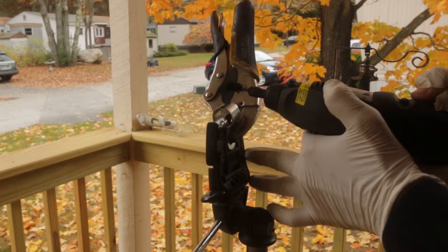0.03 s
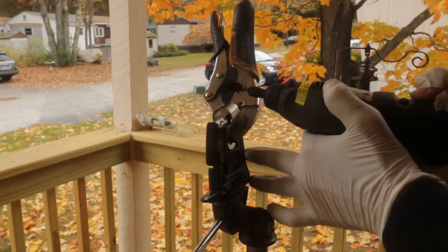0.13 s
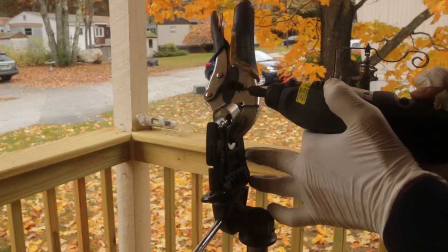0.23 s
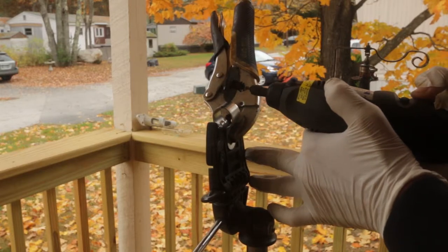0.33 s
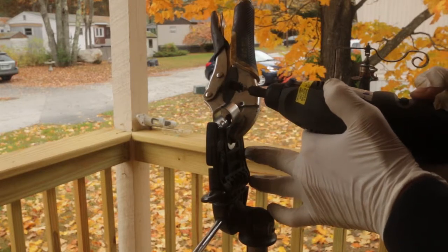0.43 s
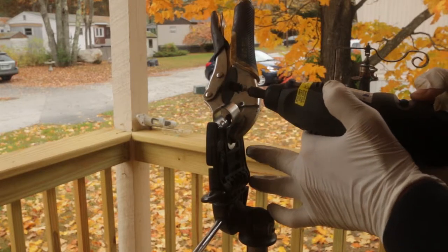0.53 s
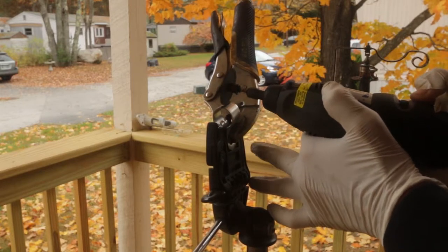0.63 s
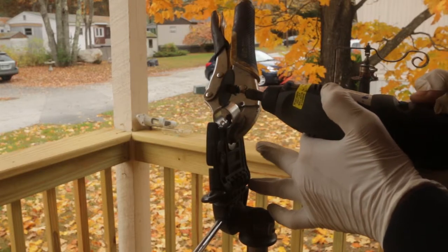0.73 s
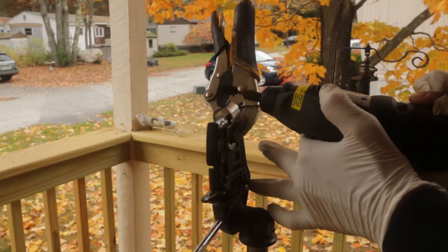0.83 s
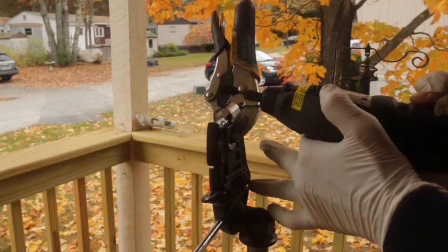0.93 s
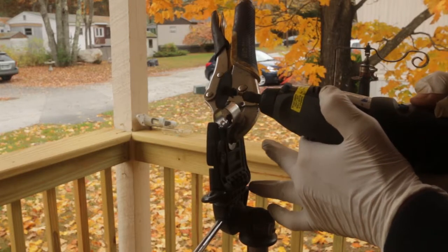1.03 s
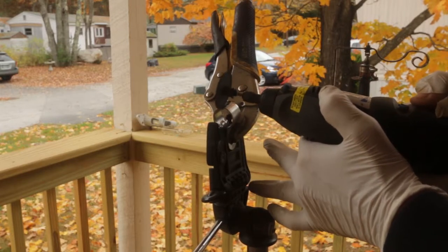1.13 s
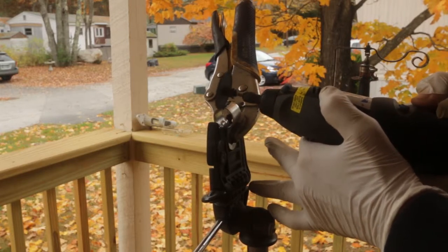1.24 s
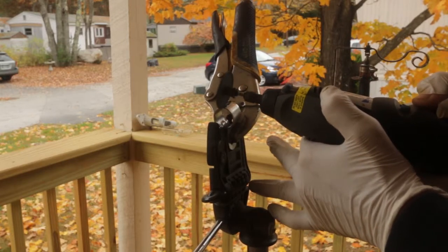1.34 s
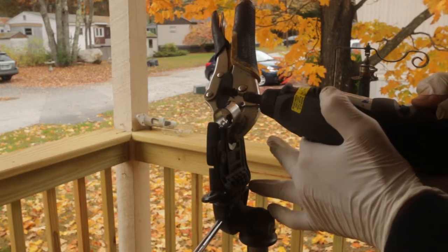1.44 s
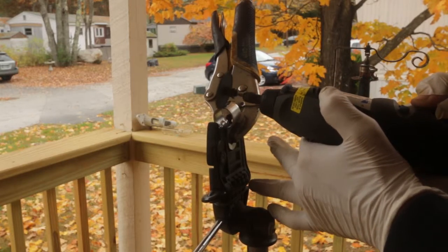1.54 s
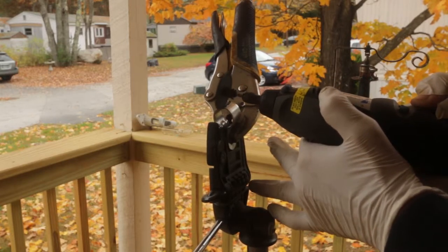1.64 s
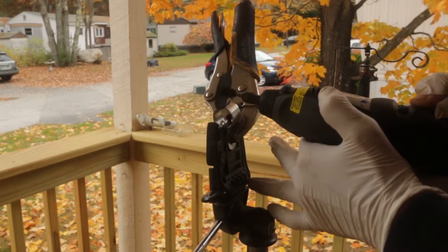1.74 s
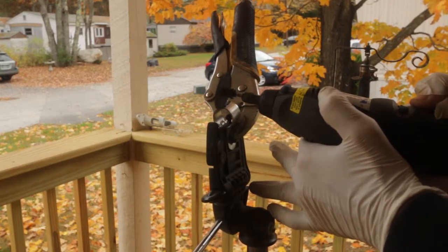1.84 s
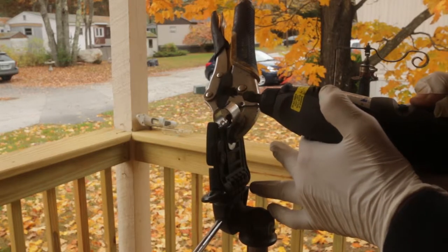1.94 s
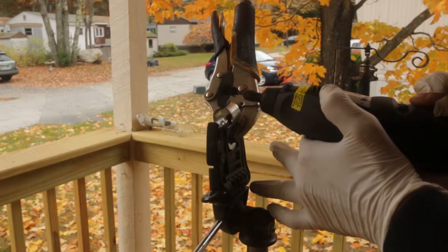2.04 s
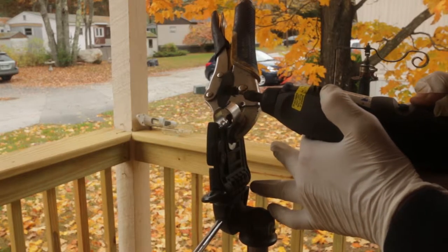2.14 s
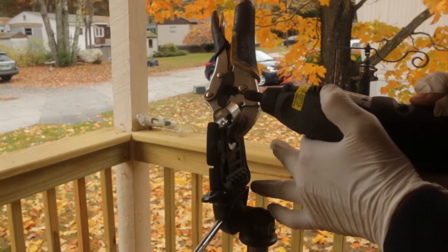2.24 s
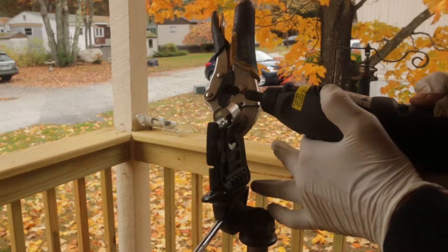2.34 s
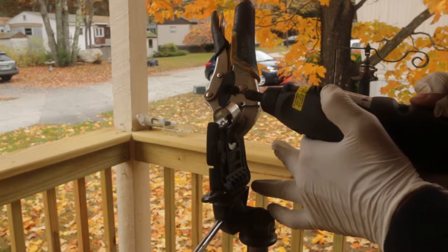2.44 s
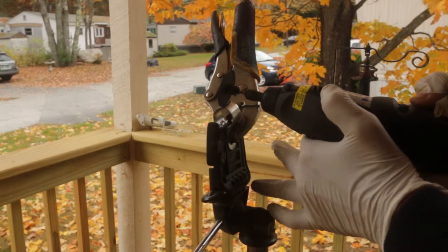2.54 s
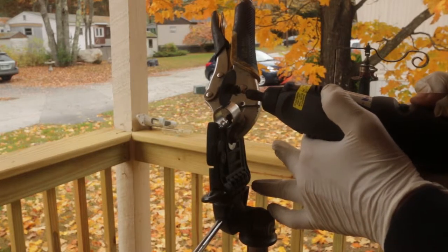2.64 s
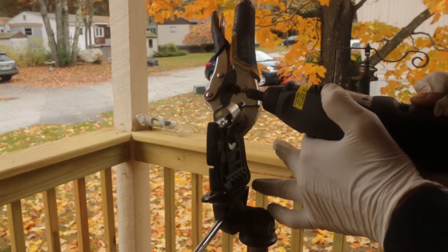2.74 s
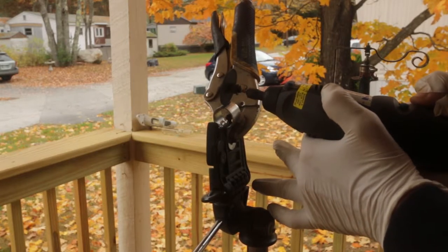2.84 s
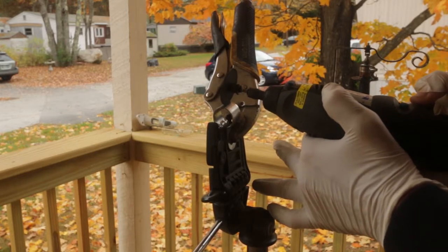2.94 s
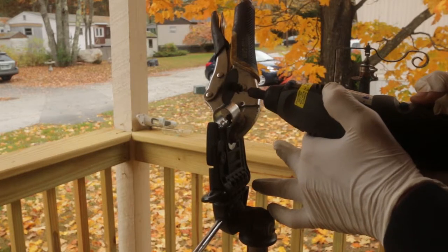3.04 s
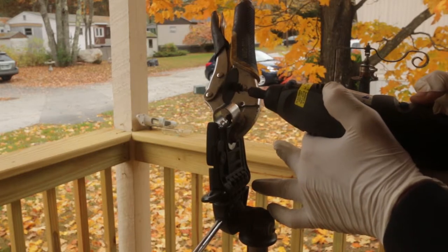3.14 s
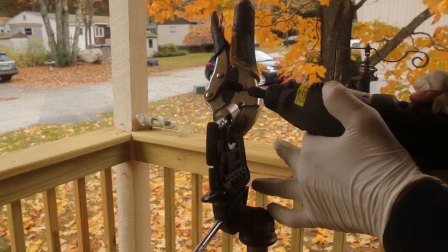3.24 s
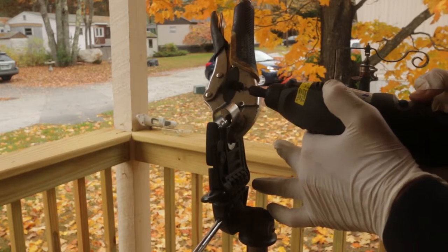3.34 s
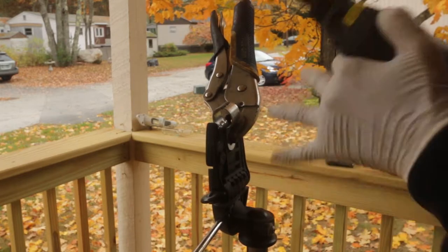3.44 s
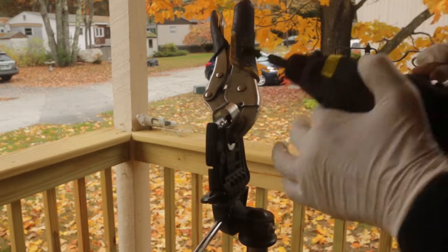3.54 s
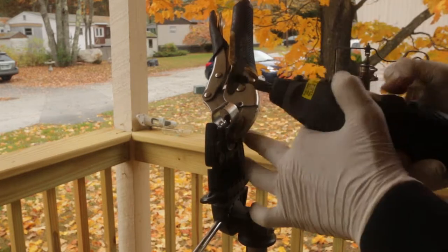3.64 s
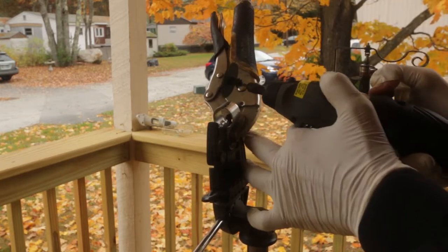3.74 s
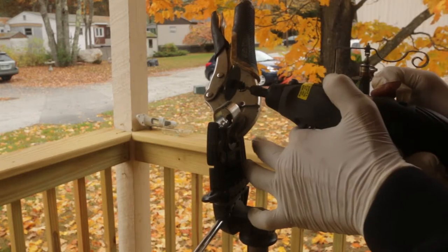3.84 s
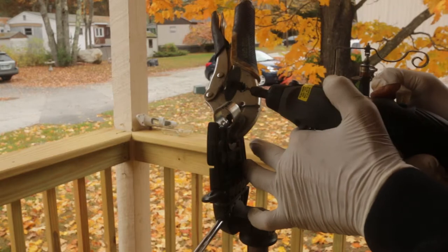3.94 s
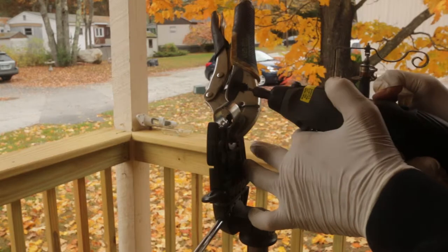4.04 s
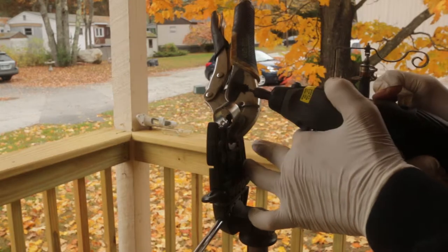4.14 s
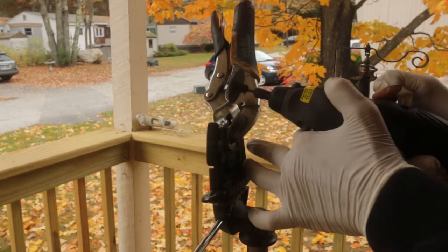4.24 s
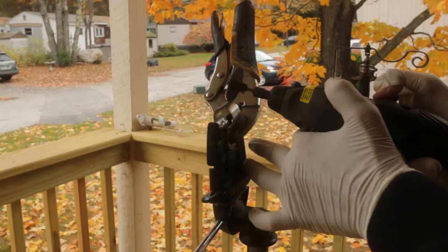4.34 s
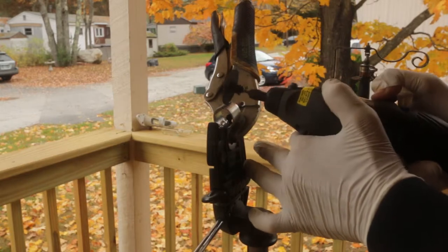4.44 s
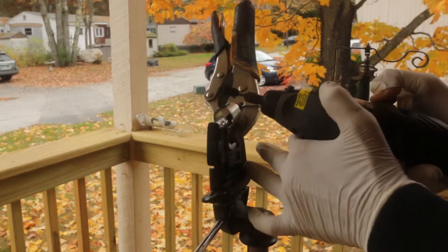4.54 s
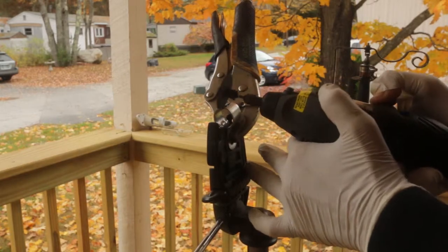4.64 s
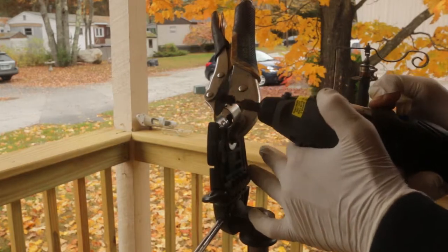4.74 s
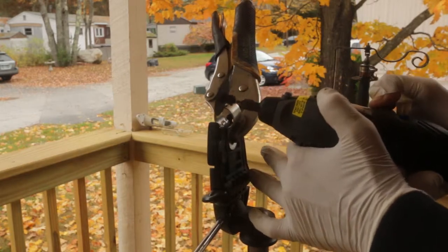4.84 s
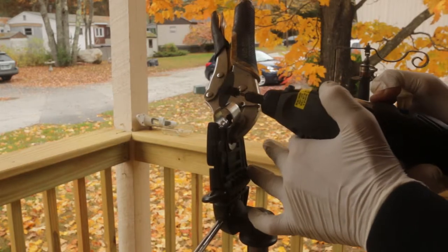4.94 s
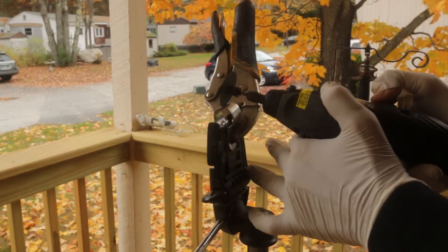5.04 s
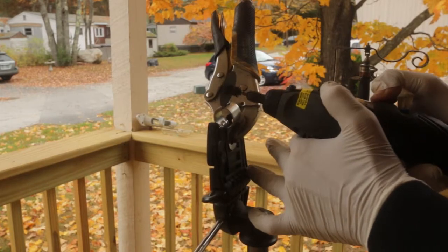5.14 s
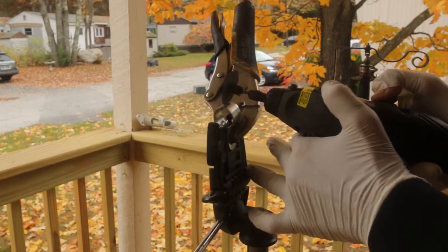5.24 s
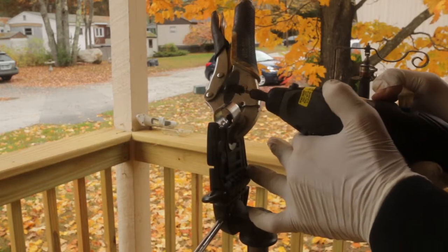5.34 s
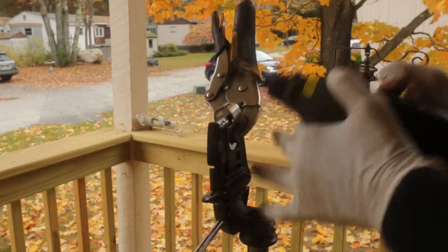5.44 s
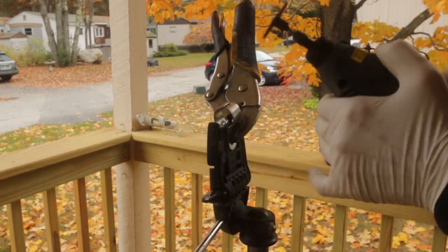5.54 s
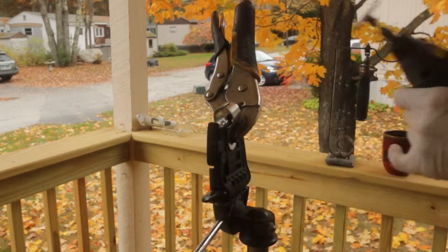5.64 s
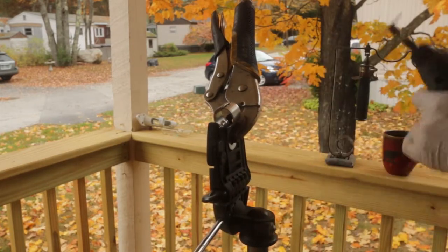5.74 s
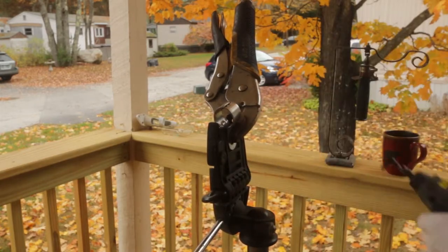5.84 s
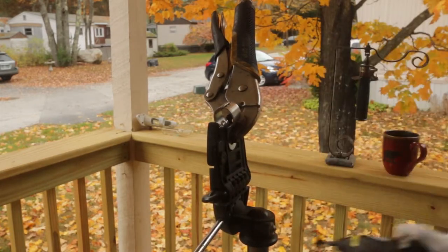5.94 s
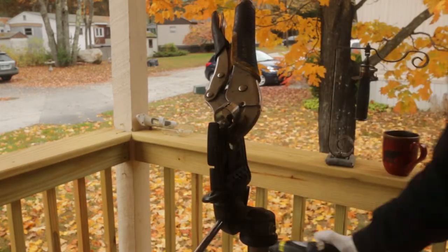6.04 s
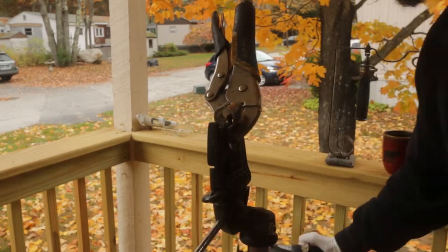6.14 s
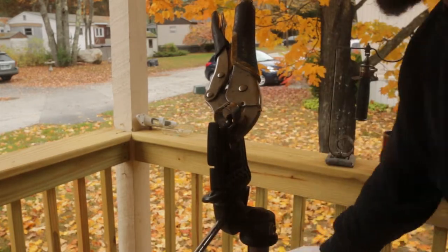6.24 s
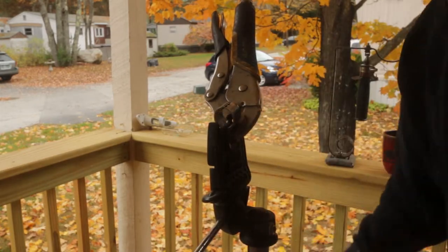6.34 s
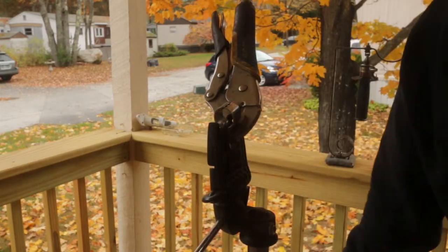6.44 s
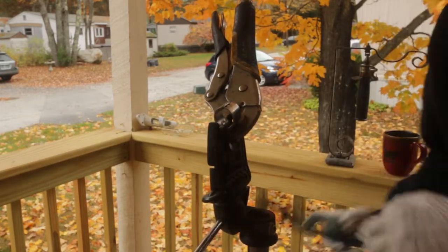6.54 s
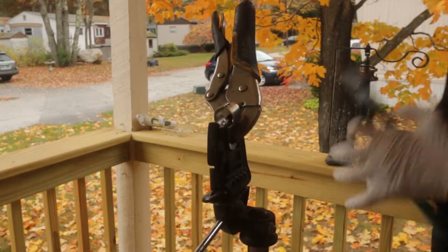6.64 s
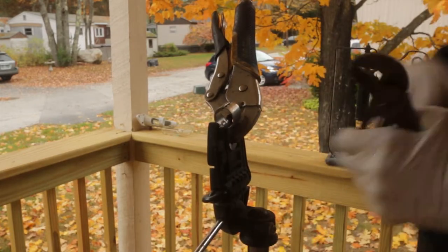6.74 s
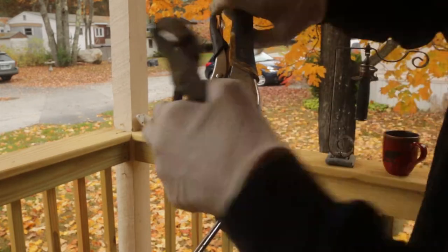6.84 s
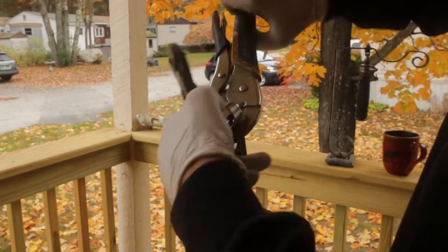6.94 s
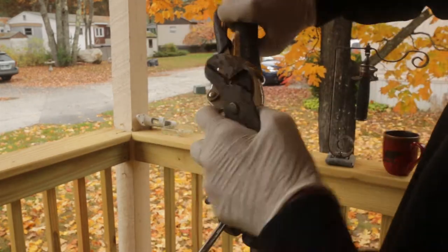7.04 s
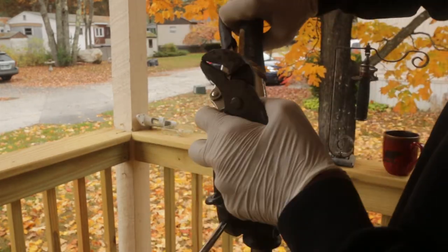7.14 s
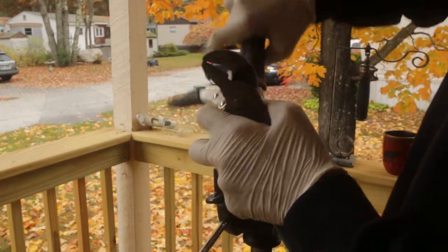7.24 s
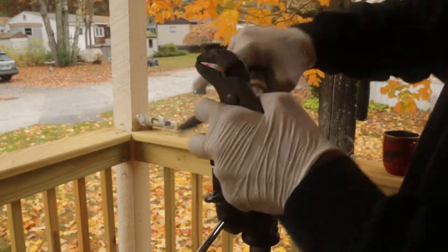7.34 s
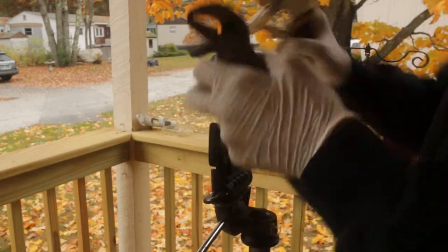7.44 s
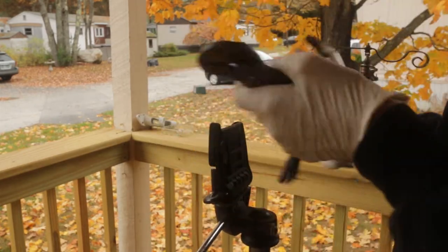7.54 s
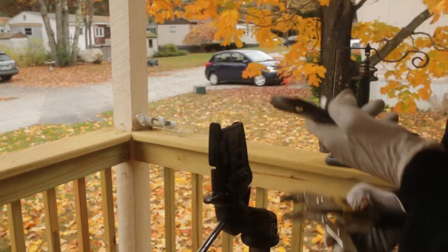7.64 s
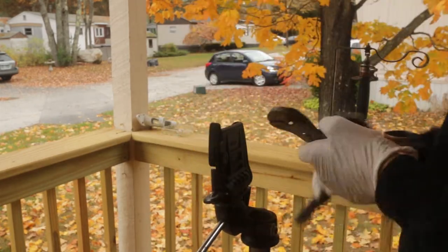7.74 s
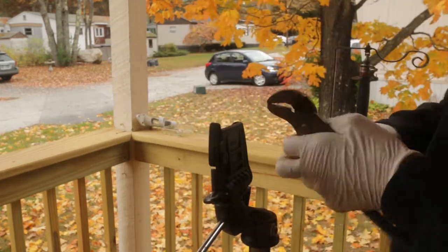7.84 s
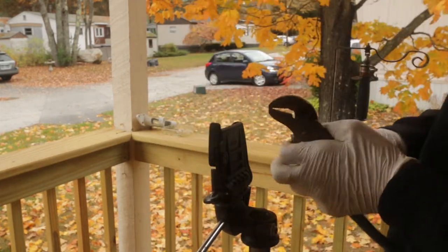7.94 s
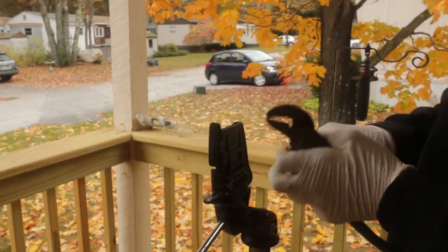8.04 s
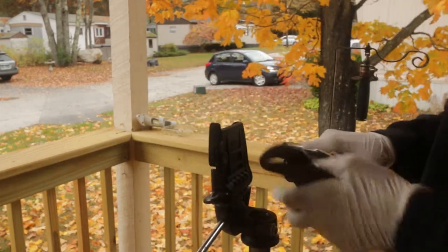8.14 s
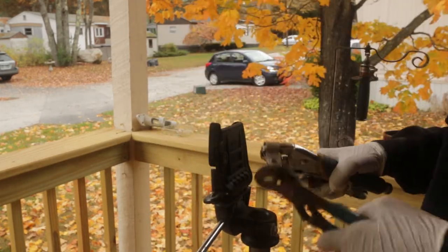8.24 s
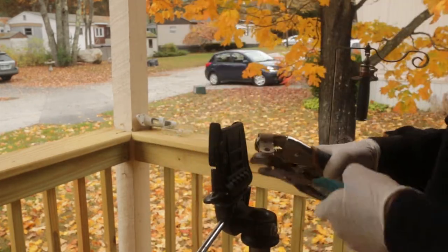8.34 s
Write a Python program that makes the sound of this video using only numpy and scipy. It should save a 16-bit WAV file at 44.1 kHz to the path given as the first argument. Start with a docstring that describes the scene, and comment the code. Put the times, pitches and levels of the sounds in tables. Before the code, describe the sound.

Very close on an open porch, a small high-speed rotary tool grinds plastic with a shrill, wavering whine and bright abrasive hiss. It lifts and races up briefly, bites again with its pitch sagging, lifts once more and spins down to a stop. Then knocks on a wooden rail, plier ticks, a faint creak, one loud brittle snap and light metallic clicks over soft outdoor air and a droning car.

```python
"""On an open porch a small rotary tool grinds through a plastic part, close to the two microphones.
Motor harmonics sag with a table of cutting speeds, race up at two lifts and coast to a stop; filtered
noise makes the grinding hiss and the fan. Noise bursts knock on wood, creak, click like pliers and snap
the part off. Behind, shaped noise and wavering sines make the outdoor air and a car on the street."""
import sys
import numpy as np
from scipy import signal
from scipy.fft import rfft, irfft, next_fast_len
from scipy.io import wavfile

SR = 44100
rng = np.random.default_rng(int(sys.argv[2]) if len(sys.argv) > 2 else 0)


def file_out(sig):
    """Save sig as 16-bit WAV at sys.argv[1]."""
    # one column per channel
    cols = np.atleast_2d(sig).T
    # limit, then scale
    lim = np.clip(cols, -1, 1)
    pcm = np.round(lim * 32767).astype(np.int16)
    wavfile.write(sys.argv[1], SR, pcm)


N = 369558
T = np.arange(N) / SR

CHOP_HZ = 447  # rate at which the motor current is chopped
FREE_HZ, LOADED_HZ = 1620, 1100  # whine fundamental running free and under full load
OFF_S, STOP_S = 5.82, 6.19  # switched off, shaft at rest
RELEASE_S = 0.018

# the wheel in the plastic, levels before pressure and resonance act on them:
# start_s, end_s, squeal_db, rim_ring_db, upper_harmonics_db
CUTS = [(-0.1, 3.485, -25.5, -53, 1), (3.88, 5.528, -35, -26.5, -4.5)]


def undb(db):
    """Decibels to gain."""
    return 10 ** (np.asarray(db) / 20)


def unit(x):
    """Scale to rms 1."""
    return x / np.sqrt(np.mean(x ** 2))


def noise():
    """White noise as long as the scene."""
    return rng.standard_normal(N)


def curves(table):
    """The columns of a table, joined by straight lines in time."""
    s, *columns = np.transpose(table)
    return [np.interp(T, s, c) for c in columns]


def shape(x, gain):
    """Filter by a response given as a function of frequency."""
    size = next_fast_len(len(x) + 4096)
    hz = np.maximum(np.arange(size // 2 + 1) * SR / size, 1)
    return irfft(rfft(x, size) * gain(hz), size)[:len(x)]


def colour(x, points):
    """Filter by a (Hz, dB) spectrum, joined over log frequency."""
    at, db = np.transpose(points)
    return shape(x, lambda hz: undb(np.interp(np.log(hz), np.log(at), db)))


def tinted(x, gain):
    """Filter without changing the power of white noise."""
    return shape(x, lambda hz: gain(hz) / np.sqrt(np.mean(abs(gain(hz)) ** 2)))


def resonance(hz, centre, width):
    """Response of one damped mode, 1 at its centre."""
    return 1 / (1 + 1j * (hz ** 2 - centre ** 2) / (hz * width))


def ragged(hz, spacing_hz):
    """Random hills and dips over frequency, spread 1: many close modes and reflections."""
    heights = rng.standard_normal(1024)
    return np.interp(hz / spacing_hz, np.arange(len(heights)), heights)


def walk(rate):
    """A random wander of rms 1, straight lines between `rate` new values a second."""
    steps = rng.standard_normal(8192)
    return unit(np.interp(T * rate, np.arange(len(steps)), steps))


def partial(phase, hz):
    """A sine of rms 1, silent above 17.6 kHz."""
    return np.sqrt(2) * np.sin(phase) * (hz < SR * .4)


def burst(t60, size=16384):
    """Contact noise that dies away, rms 1 at its start."""
    decay = np.exp(-np.log(1000) * np.arange(size) / SR / max(t60, .002))
    return rng.standard_normal(size) * decay


def add(out, s, x):
    """Mix x in at time s."""
    i = int(s * SR)
    out[i:i + len(x)] += x[:N - i]


def gate(start, end):
    """1 between two times, with a quick bite and release."""
    bite_s = .04
    return np.clip(np.minimum((T - start) / bite_s, (end - T) / RELEASE_S), 0, 1)


def during_cuts(gains):
    """One gain for each cut, zero while the wheel is clear of the plastic."""
    return sum(gain * gate(start, end) for gain, (start, end, *_) in zip(gains, CUTS))


def speed():
    """The cut holds the motor back; lifted, it races up; switched off, drag and friction stop it."""
    # motor speed in the plastic: start_s, whine_fundamental_hz
    first_cut_speed = [(0.03, 1154), (0.12, 1177), (0.29, 1159), (0.48, 1082), (0.55, 1128), (0.66, 1010),
                       (0.77, 1003), (1.03, 1054), (1.09, 1036), (1.23, 1195), (1.31, 1194), (1.39, 1147),
                       (2.0, 1083), (2.31, 1071), (2.64, 995), (2.86, 1041), (3.01, 1022), (3.18, 1084),
                       (3.25, 1069), (3.44, 1099)]
    second_cut_speed = [(3.89, 1596), (3.984, 1563), (4.256, 1327), (4.364, 1315), (4.57, 1091),
                        (4.652, 1209), (4.736, 1209), (4.898, 1086), (5.038, 1103), (5.168, 952),
                        (5.28, 995), (5.374, 932), (5.5, 940)]
    # wheel lifted clear, one row for each cut: start_s, free_speed_hz, time_constant_s
    lifts = [(3.482, 1615, .128), (5.503, 1640, .103)]
    drag_s, friction_hz_per_s = .55, 1400
    hz = np.zeros(N)
    for cut, (lift, free_hz, lag_s) in zip((first_cut_speed, second_cut_speed), lifts):
        held, = curves(cut)
        racing = free_hz + (held - free_hz) * np.exp(-np.maximum(T - lift, 0) / lag_s)
        hz = np.where((T >= cut[0][0]) | (hz == 0), racing, hz)
    brake = friction_hz_per_s * drag_s
    off_hz = np.interp(OFF_S, T, hz)
    coasting = (off_hz + brake) * np.exp(-np.maximum(T - OFF_S, 0) / drag_s) - brake
    return np.maximum(np.where(T < OFF_S, hz, coasting), 1)


def load(hz):
    """Pressure on the wheel and motor current, 0-1: the further the speed sags in a cut, the greater both."""
    idle_press, idle_current = .1, .3
    sag = during_cuts([1, 1]) * np.clip((FREE_HZ - hz) / (FREE_HZ - LOADED_HZ), 0, 1)
    powered = np.clip((OFF_S - T) / RELEASE_S + 1, 0, 1)
    press = powered * (idle_press + (1 - idle_press) * sag)
    current = powered * (idle_current + (1 - idle_current) * sag ** 2)
    return press, current


def whine(hz, turn, chop, press, current, ripple_db=3.0, flutter_db=3.5, beat_db=-53):
    """Harmonics of the motor; each pulse of the chopped current jerks the rotor and hangs sidebands on them."""
    # upper harmonics, levels before speed, load and housing: multiple, loaded_db, free_db
    overtones = [(4, -52, -36), (5, -46, -34), (6, -50, -34), (7, -49, -35), (9, -42, -38),
                 (11, -42.5, -42), (14, -37.5, -50), (16, -41, -55)]
    pulses = np.sin(chop) + .35 * np.sin(2 * chop + 1)
    jerk = .15 * (1 - .55 * press) * np.minimum(4 * current, 1) * pulses
    angle = turn + jerk
    shaft = turn + .3 * jerk * (1 - press)
    out = shaking(hz, shaft, press) + squealing(hz, turn, chop, press)
    # running free, the lines grow with speed; coasting without current they are much weaker
    free = (hz / 1530) ** 3 * np.minimum(.22 + 3 * current, 1) * (1 - .6 * press ** 2)
    loaded = press * during_cuts(undb(db) for *_, db in CUTS)
    multiples, loaded_db, free_db = np.transpose(overtones)
    grid = np.linspace(0, SR / 2, 2048)
    for k in range(4, 17):
        loaded_size = loaded * undb(np.interp(k, multiples, loaded_db))
        free_size = free * undb(np.interp(k, multiples, free_db))
        lift_db = housing_db(grid + 1) + ripple_db * ragged(grid, 90)
        level_db = np.interp(k * hz, grid, lift_db) + flutter_db * walk(35) + 2 * press * walk(7)
        size = np.hypot(loaded_size, free_size) * undb(level_db)
        roughness = press * (.3 * walk(300) + .25 * walk(40))  # phase wander, radians
        out = out + size * partial(k * angle + roughness, k * hz)
    # speed and chopping beat in a faint lower tone
    out = out + undb(beat_db + 2 * walk(12)) * free * (1 - press) ** 2 * partial(turn - chop, hz)
    # the windings themselves hum at the chopping rate
    windings = undb(-53.5) * partial(chop, hz) + undb(-61) * partial(2 * chop, hz)
    return out + current * windings


def shaking(hz, shaft, press, floor_db=-55, waver_db=1.75):
    """Unbalance grows with the square of the speed; each low harmonic swells as it crosses a mode of the housing."""
    # housing modes that the unbalanced shaft shakes: centre_hz, width_hz, level_db
    shake_modes = [(1061, 250, -45.5), (1510, 190, -43), (2151, 37, -42.5), (2398, 23, -35.5),
                   (3116, 222, -30), (3740, 90, -23), (4345, 363, -14.5), (4730, 170, -16)]
    # relative level of the low harmonics as the grip shifts: start_s, first_db, second_db, third_db
    shake_level = [(0.1, -4.5, 3, -9), (0.4, 4, -2, -8), (.65, -6, 1, -5), (1.27, -7.5, -5, -19),
                   (1.45, 2, -1.5, -16), (3.4, -1.5, 1, -13), (3.49, -12, -11, -12), (3.64, 5, 2.5, -6.5),
                   (3.76, 1, 2.5, -8), (3.84, 3.5, 0.5, -11), (4.05, 0, -7.5, -12.5),
                   (4.25, -8.5, -0.5, -16), (4.8, -12, -3, -9), (5.47, 3.5, -7.5, -25),
                   (5.55, -13, -21, -23), (5.66, -3.5, -12, -15), (5.75, -2, -13.5, -14),
                   (5.86, -1, -16, -16), (5.93, 0, -9, -25), (6.12, 5, -4, 2)]
    out = 0
    for k, level_db in enumerate(curves(shake_level), 1):
        modes = sum(undb(d) / (1 + (2 * (k * hz - f) / w) ** 2) for f, w, d in shake_modes)
        response = undb(floor_db) + modes
        waver = waver_db * walk(9) + (.6 + 1.3 * press) * walk(60)
        out = out + response * undb(level_db + waver) * partial(k * shaft, k * hz)
    return out * (hz / LOADED_HZ) ** 2


def squealing(hz, turn, chop, press, flutter_db=1.9, swell_db=1.2):
    """The 8th harmonic and its sidebands squeal whenever they pass a sharp resonance of the motor."""
    # lines beside the 8th harmonic: multiple_of_chopping_rate, relative_level_db
    sidebands = [(-1, -2.5), (0, -3), (1, -5.5)]
    squeal_hz, width_hz, free_db = 9030, 360, -37
    cutting = press * during_cuts(undb(db) for _, _, db, _, _ in CUTS)
    size = undb(free_db) * (T < OFF_S) + cutting
    slip = 8 * turn + .27 * walk(250)
    out = 0
    for side, db in sidebands:
        line_hz = 8 * hz + round(side) * CHOP_HZ
        ring = abs(resonance(line_hz, squeal_hz, width_hz))
        level = undb(db + flutter_db * walk(50) + swell_db * walk(10))
        out = out + ring * level * partial(slip + round(side) * chop, line_hz)
    return size * out


def housing_db(hz):
    """How much the ringing housing and wheel lift each frequency."""
    # ringing modes: centre_hz, width_hz, lift_db
    housing = [(3750, 80, 13), (5120, 200, 5), (5720, 160, 7), (7250, 300, 5), (9900, 500, 4),
               (14500, 400, 8), (15400, 300, 6)]
    return sum(db * abs(resonance(hz, f, w)) ** 2 for f, w, db in housing)


def grinding(turn, chop, press, grain_db=0.8, chatter_db=1.0, bite=0.051, rasp_db=-1, hum_db=-52):
    """Grit tears the plastic in tiny grains, bunched by the turning wheel; the wheel's rim sings and the case hums."""
    # relative spectrum of the abrasive hiss: frequency_hz, density_db_per_hz
    hiss_spectrum = [(100, -38), (300, -44), (700, -26), (950, -34), (1350, -19), (2000, -11), (3000, -3),
                     (5000, -3), (8000, -1), (9500, 4), (11000, 0), (13000, 2.5), (15000, -4), (16000, 0.5)]
    # hiss before trim, pressure and chatter, one curve for each cut: start_s, level_db
    hiss_level = [
        [(0, -22.5), (.3, -22), (.45, -27), (.63, -22.5), (1.2, -26.5), (1.35, -26), (1.52, -24), (2.6, -25),
         (3.3, -24.5), (3.45, -20)],
        [(3.95, -33), (4.3, -24), (4.6, -29.5), (5.5, -25.5)],
    ]
    trim_db = -0.5
    grains = noise() * undb(grain_db * press * walk(980))
    grains = grains * (1 + bite * np.cos(turn)) * (1 + 0.026 * np.cos(chop))
    hiss = colour(grains, hiss_spectrum)
    hiss = unit(shape(hiss, lambda hz: undb(1.1 * housing_db(hz) + 4.2 * ragged(hz, 122.8))))
    low = shape(hiss, lambda hz: 1 / (1 + (hz / 7500) ** 4))
    cutting = press * during_cuts(undb(curves(level)[0] + trim_db) for level in hiss_level)
    sound = cutting * (hiss - low + undb(rasp_db) * low)
    rim_size = press * during_cuts(undb(db) for _, _, _, db, _ in CUTS)
    rim = unit(shape(noise(), lambda hz: resonance(hz, 14240, 1700) ** 2))
    rim = rim * rim_size * undb(1.8 * walk(40))
    hum = unit(shape(noise(), lambda hz: resonance(hz, 1003, 198) ** 2))
    return sound * undb(chatter_db * walk(70)) + rim + undb(hum_db) * press * hum


def fan(hz, ripple_db=4.5):
    """The rush of the cooling fan grows with speed; the bearings scrape until the shaft stops."""
    # relative spectrum of the rush: frequency_hz, density_db_per_hz
    fan_spectrum = [(100, -37), (500, -24), (1000, -22), (1500, -10), (2800, -3.5), (4500, 4), (7000, 1),
                    (10000, -3.5), (13000, -4.5), (16000, -3)]
    air_db, air_db_per_octave = -28.5, 31.5  # at free speed, per doubling of speed
    bearing_db, bearing_fade_s = -40.5, 0.13
    rush = colour(noise(), fan_spectrum)
    rush = unit(shape(rush, lambda f: undb(ripple_db * ragged(f, 136))))
    air = undb(air_db + air_db_per_octave * np.log2(hz / FREE_HZ))
    fade = np.sqrt(np.clip((STOP_S - T) / bearing_fade_s, 0, 1))
    bearings = undb(bearing_db + 2.5 * walk(30)) * fade
    return rush * np.hypot(air, bearings)


def thud(t60, tilt_db):
    """One contact rings the case and the rail; a soft one keeps only the low modes."""
    # the tool's case against the rail: centre_hz, width_hz, level_db
    case = [(153, 14, -16), (250, 43, -26), (504, 200, -2.5), (920, 420, 4), (1503, 100, 9),
            (1860, 550, 2.5), (2800, 168, -12), (3090, 61, 0), (3560, 330, -4.5), (6340, 1400, -12)]

    def body(hz):
        modes = sum(undb(d) * resonance(hz, f, w) for f, w, d in case)
        tilt = undb(tilt_db * np.log2(np.maximum(hz, 130) / 1500))
        return modes * tilt * resonance(hz, 1860, 7900)

    return tinted(burst(t60), body)


def crack(t60, centre, tail_db=-20, tail_t60=0.12, crack_db=-2):
    """A sharp crack and a short bright rattle."""
    contact = undb(crack_db) * burst(0.0025) + burst(t60) + undb(tail_db) * burst(tail_t60)
    return tinted(contact, lambda hz: resonance(hz, centre, centre) * resonance(hz, centre, 2 * centre))


def knocks(edge_octaves=1.2):
    """Each knock lands twice: the edge with a tick, fainter on dull knocks, then the duller body."""
    # on the wooden rail and the clamp, and the wheel nicking the part at 3.615 s: start_s, level_db, t60_s,
    # brightness_db_per_octave
    knock_table = [(2.556, -43, 0.14, -10), (3.615, -23, 0.11, 8), (4.224, -53, 0.064, -12),
                   (6.055, -29.5, 0.053, -7), (6.119, -37, 0.17, 5.5), (6.334, -22, 0.069, -1),
                   (6.389, -45.5, 0.26, 2.5), (6.503, -27.5, 0.15, 2.5), (6.552, -25.5, .07, 1),
                   (6.685, -39.5, 0.027, -1), (6.761, -36.5, .03, -5.5), (7.093, -35.5, 0.028, -3.5),
                   (7.308, -44.5, 0.17, 1.5)]
    edge_db, edge_hz = -6.5, 9400
    bounce_s, bounce_db, dulling_db_per_octave = .0085, -3.5, -4.5
    out = np.zeros(N)
    for s, db, t60, tilt in knock_table:
        tick = undb(edge_db + edge_octaves * min(tilt, 0)) * crack(0.82 * t60, edge_hz)
        add(out, s, undb(db) * (thud(t60, tilt) + tick))
        body = thud(1.08 * t60, tilt + dulling_db_per_octave)
        add(out, s + bounce_s, undb(db + bounce_db) * body)
    return out


def creaks(per_s=50, db=-52):
    """The plastic creaks in small random slips as the pliers take hold."""
    start_s, end_s, creak_hz = 6.91, 7.17, 1000
    slips = (rng.random(N) < per_s / SR) * undb(4 * noise())
    slips = slips * (T > start_s) * (T < end_s)
    rattle = signal.fftconvolve(slips, burst(0.14))[:N]
    return undb(db) * tinted(rattle, lambda hz: resonance(hz, creak_hz, 500))


def clicks(ring_db=0):
    """Pliers tick against plastic in bright noise, and the steel jaw rings in decaying sines."""
    # pliers and plastic, ring relative to the click: start_s, level_db, t60_s, centre_hz, jaw_ring_db
    click_table = [(6.722, -34, .07, 9450, -32), (6.779, -37, .07, 8000, -30), (6.809, -37, .04, 9500, -30),
                   (6.816, -20, 0.063, 10300, -25), (7.306, -41.5, 0.28, 10600, -30),
                   (7.454, -38, 0.18, 7850, -20), (7.595, -34.5, 0.029, 8500, -9),
                   (7.642, -40, .03, 11000, -9), (7.665, -35, .035, 11000, -19),
                   (7.69, -32.5, 0.025, 11000, -7), (7.794, -39.5, .17, 12000, -2),
                   (7.992, -33.5, 0.13, 13000, -5), (8.023, -34, 0.076, 13000, 2),
                   (8.094, -40, .16, 12000, -22), (8.129, -39, 0.083, 9700, -20)]
    # ringing of the steel jaw: pitch_hz, t60_s, relative_level_db
    jaw = [(8600, 0.084, 0), (8600, .07, -6), (9360, .05, -12), (9100, .05, -12)]
    out = np.zeros(N)
    for s, db, t60, centre, jaw_db in click_table:
        click = crack(t60, centre)
        t = np.arange(len(click)) / SR
        ring = 0
        for f, decay, d in jaw:
            phase = 2 * np.pi * f * t + rng.uniform(0, 2 * np.pi)
            ring = ring + undb(d - 60 * t / decay) * np.sin(phase)
        add(out, s, undb(db) * (click + undb(jaw_db + ring_db) * ring))
    return out


def snap(body_db=-25, body_t60=0.043, body_tilt_db=-1.5):
    """The scored plastic cracks, breaks through a moment later with a thud and rattles out."""
    snap_s, snap_db, snap_hz, snap_t60_s = 7.2762, -7, 14000, 0.0057
    # the other levels are relative to the snap
    lead_s, first_db, first_t60_s = 0.0054, -1.5, 0.022
    rattle_db, rattle_t60_s = -25, 0.098
    out = np.zeros(N)
    add(out, snap_s - lead_s, undb(first_db) * crack(first_t60_s, snap_hz))
    add(out, snap_s, crack(snap_t60_s, snap_hz) + undb(rattle_db) * crack(rattle_t60_s, snap_hz))
    add(out, snap_s, undb(body_db) * thud(body_t60, body_tilt_db))
    return undb(snap_db) * out


def street(engine_db=-5):
    """Outdoor air and a car's tyres are shaped noise; its droning engine is a set of wavering sines."""
    # relative spectrum of the outdoor air: frequency_hz, level_db
    air_spectrum = [(18, -54), (30, -24), (53, -83), (130, -1.5), (226, -8), (471, 3.5), (645, -6),
                    (795, -1.5), (1840, -14.5), (2950, -16), (14600, -16.5), (15800, -12)]
    # slow levels, before a small random waver: start_s, air_db, car_db
    street_level = [(0, -58.5, -70), (5.55, -61.5, -70), (5.85, -47.5, -56), (6.6, -50.5, -57.5),
                    (7.3, -51, -56), (7.9, -51, -52), (8.38, -51.5, -53.5)]
    # relative spectrum of the tyres: frequency_hz, density_db_per_hz
    tyre_spectrum = [(100, -17.5), (280, -9.5), (430, -1.5), (700, -11), (1500, -13), (3000, -9),
                     (5000, -20.5), (12000, -33)]
    # engine tones, before their waver: pitch_hz, relative_level_db
    engine_tones = [(277, -1), (402, 1.5), (504, 1.5), (562, -3)]
    air_db, car_db = curves(street_level)
    air = unit(colour(noise(), air_spectrum)) * undb(air_db + 0.43 * walk(4.1))
    tyres = unit(colour(noise(), tyre_spectrum))
    drone = 0
    for hz, db in engine_tones:
        phase = 2 * np.pi * np.cumsum(hz * (1 + .012 * walk(20))) / SR
        drone = drone + undb(db + 1.5 * walk(7)) * np.sin(phase)
    return air + undb(car_db + walk(4)) * (tyres + undb(engine_db) * unit(drone))


def porch(x, width, scatter_t60, echo_db=-24, echo_t60=0.011):
    """Posts and roof throw back a faint short echo; scattered sound reaches the two microphones differently."""
    echo = burst(echo_t60) * (np.arange(16384) > SR / 200)  # nothing returns in the first 5 ms
    x = x + undb(echo_db) * signal.fftconvolve(x, echo / np.linalg.norm(echo))[:N]
    scatter = burst(scatter_t60)
    scatter[:2] = 0
    scattered = signal.fftconvolve(x, scatter / np.linalg.norm(scatter))[:N]
    side = colour(scattered, width)
    return np.array([x + side, x - side])


def scene():
    """The motor's speed and load drive whine and grinding; handling and street join them on the porch."""
    # stereo spread of tool and street: frequency_hz, side_minus_mid_db
    steady_width = [(100, -15), (300, -21), (500, -26), (1200, -41.5), (2500, -74), (5000, -11), (9000, -8),
                    (15000, -8)]
    # stereo spread of knocks and clicks close to the microphones: frequency_hz, side_minus_mid_db
    handling_width = [(100, -19), (500, -21), (2000, -17), (5000, -8.5), (9000, -7), (15000, -3)]
    hz = speed()
    press, current = load(hz)
    hz = hz * (1 + 0.00121 * (press + 0.252) * walk(45))  # the wheel snags and frees itself
    turn = 2 * np.pi * np.cumsum(hz) / SR
    chop = 2 * np.pi * CHOP_HZ * T
    spinning = np.clip((STOP_S - T) / 0.017, 0, 1)
    motor = spinning * whine(hz, turn, chop, press, current)
    tool = motor + grinding(turn, chop, press) + fan(hz)
    handling = knocks() + creaks() + clicks() + snap()
    steady = porch(tool + street(), steady_width, scatter_t60=.12)
    return steady + porch(handling, handling_width, scatter_t60=0.0071)


def record(dry):
    """The microphones lose the bass below 85 Hz and the very top above 15.85 kHz."""
    top_hz = 15850
    dry = signal.sosfilt(signal.butter(4, 85, "high", fs=SR, output="sos"), dry)
    return signal.sosfilt(signal.ellip(12, .2, 80, top_hz, fs=SR, output="sos"), dry)


dry = scene()
out = record(dry)
file_out(out)
```